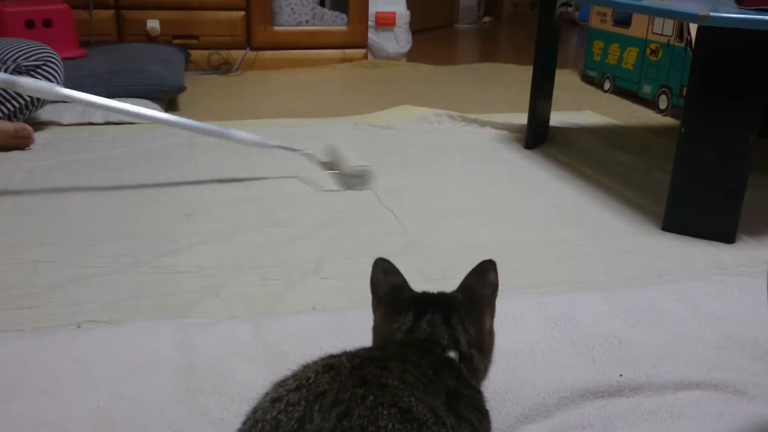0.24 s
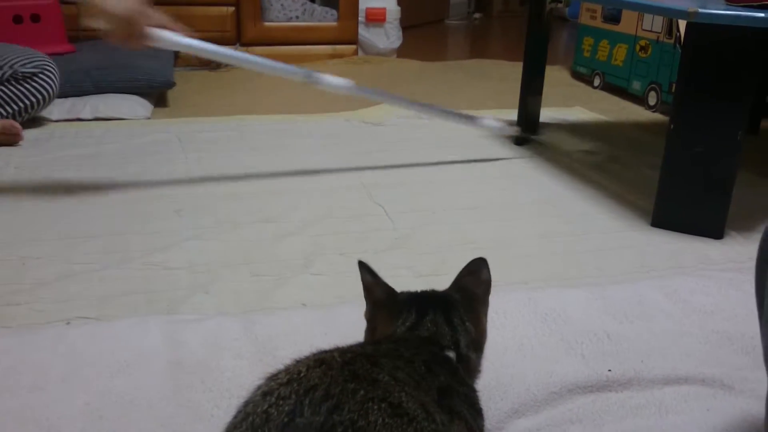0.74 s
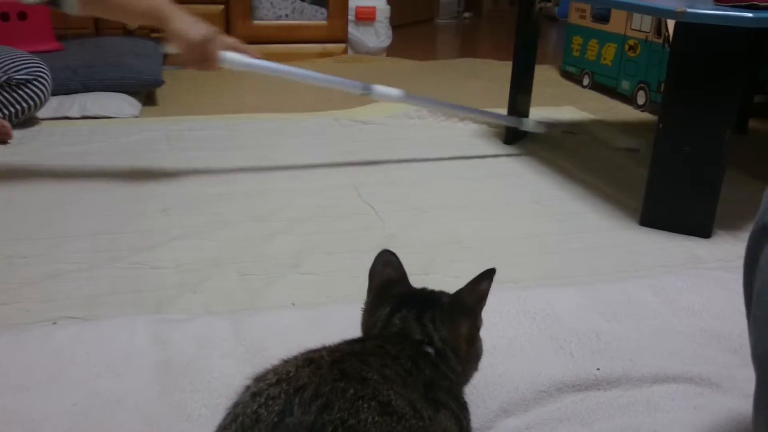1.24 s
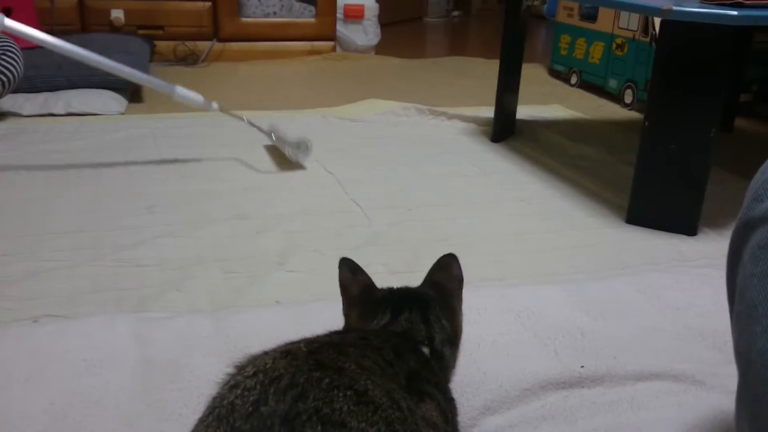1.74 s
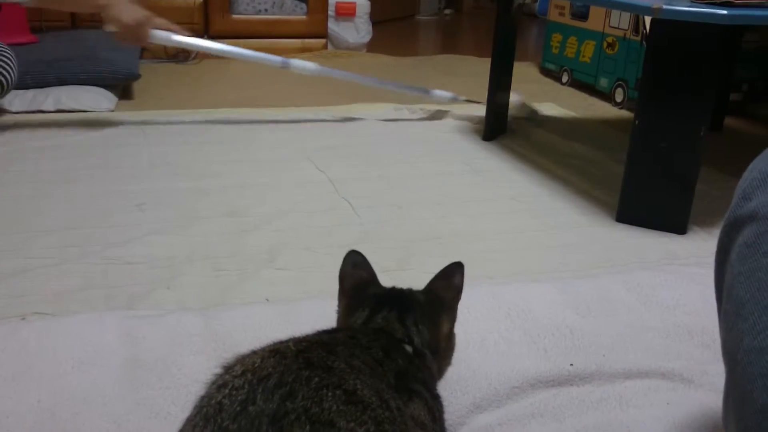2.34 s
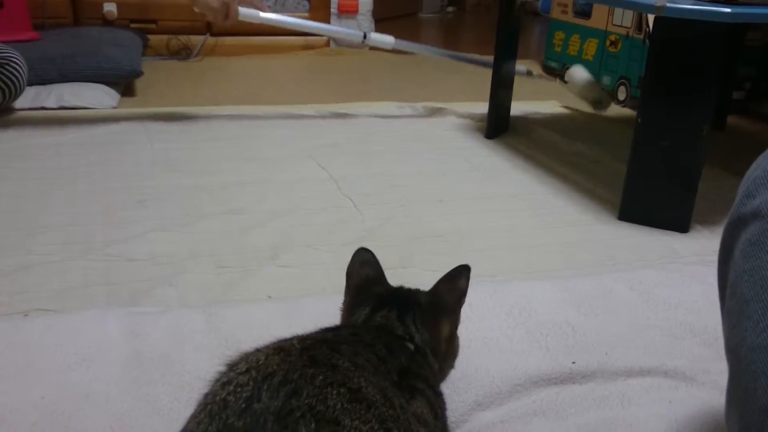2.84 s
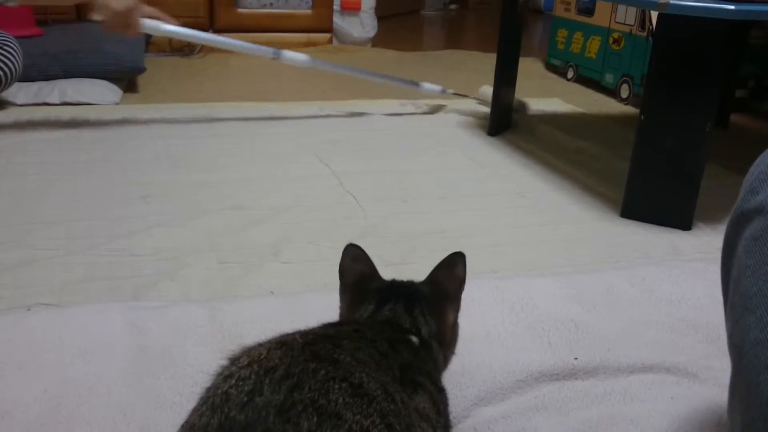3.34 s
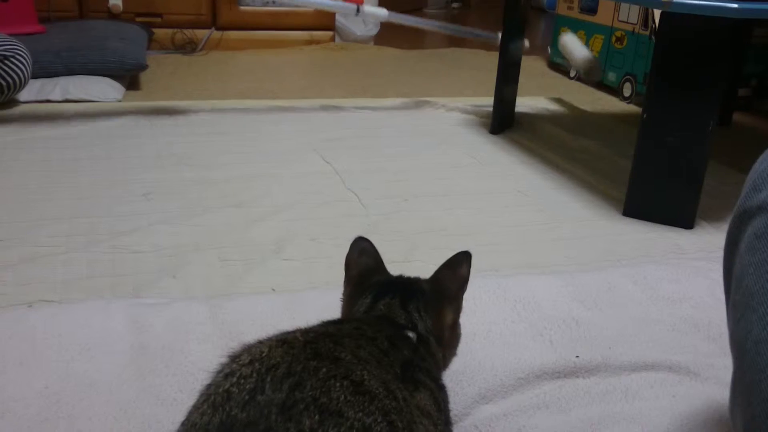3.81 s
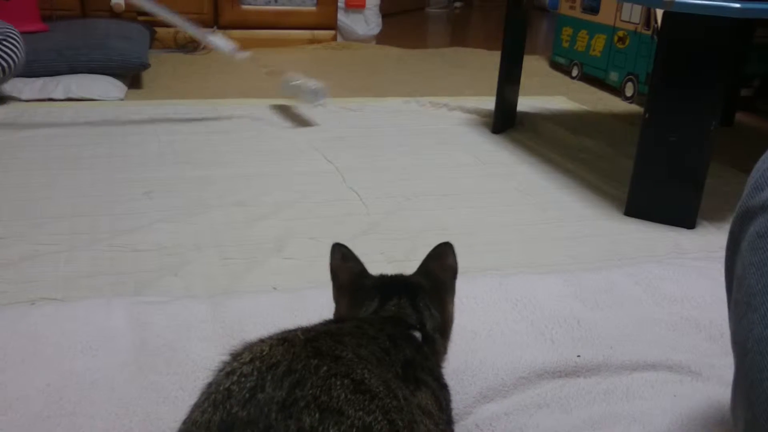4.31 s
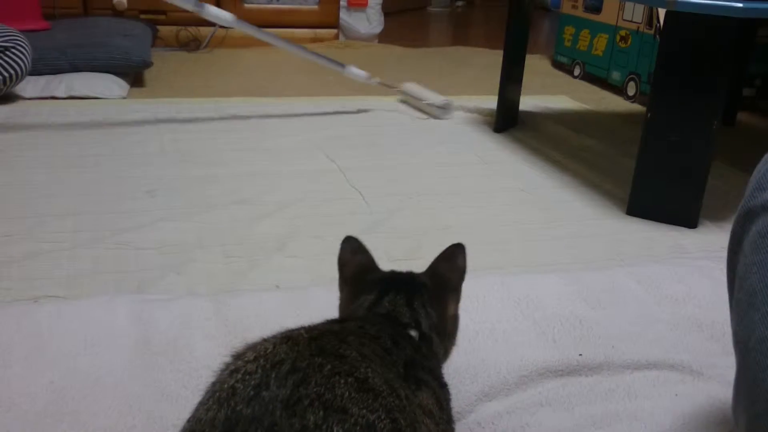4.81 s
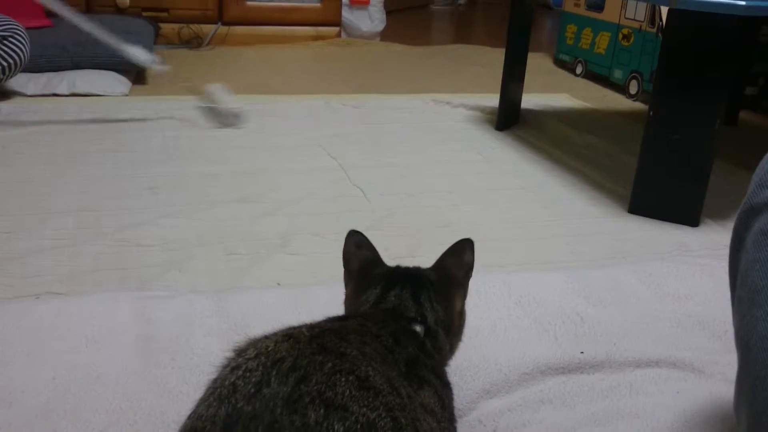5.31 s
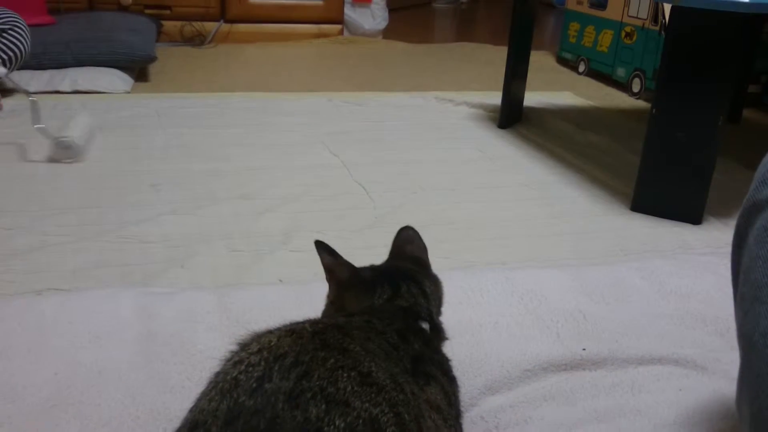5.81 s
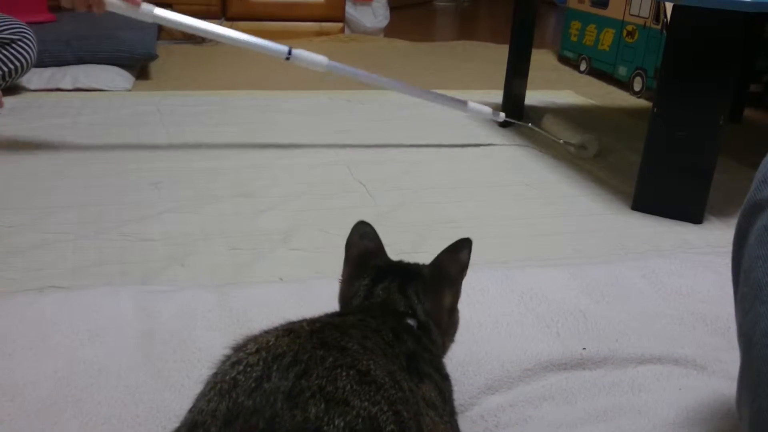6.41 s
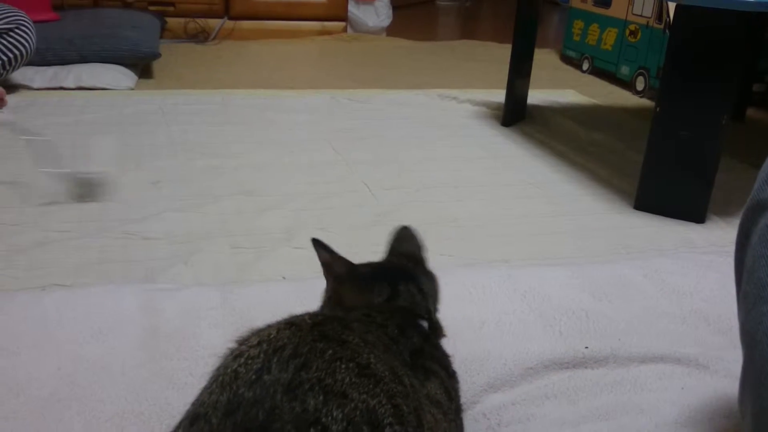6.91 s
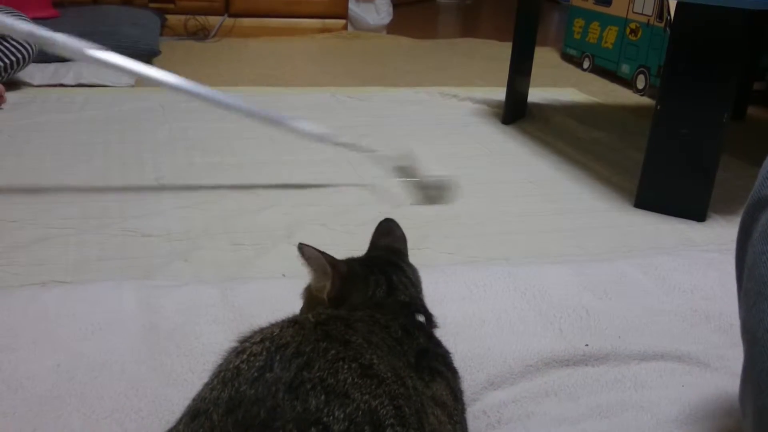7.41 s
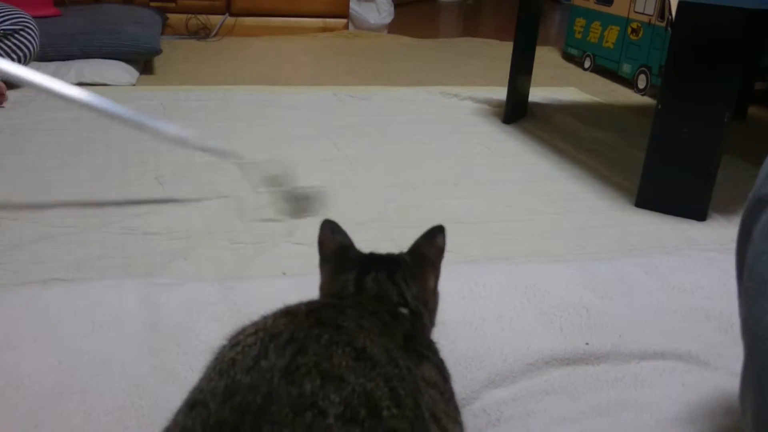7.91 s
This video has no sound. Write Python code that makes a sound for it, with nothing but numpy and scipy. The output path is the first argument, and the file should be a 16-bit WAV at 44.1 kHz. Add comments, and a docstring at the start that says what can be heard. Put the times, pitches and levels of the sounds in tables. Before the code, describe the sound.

A small carpeted living room, heard closely in stereo with a short room tail over faint low rumble and hiss. A sticky roller is already moving at 0 s, its tape crackling dryly; another light stroke runs from 0.3 to 0.9 s. A stronger sweep at 1.0-1.5 s has faint axle chirps and a knock of the handle on a low table near 1.2 s. The roller slaps the rug at 1.9 s, then a louder, sharp knock rings at 2.1 s with a dull floor thump. From 2.3 to 4.2 s it is mostly quiet, with very faint rolling and soft slaps at 3.0 and 4.2 s. Crackling sweeps return at 4.4 and 4.9 s, with a tiny squeak at 5.35 s and a crisp slap at 5.65 s. Strokes continue from 5.7 s, fullest around 6.5-6.8 s, popping and tearing, with brief chirps at 5.9, 7.2 and 7.75 s, fading near 8 s.

```python
"""Lint roller on a living-room rug

A small carpeted living room: a sticky roller on a long handle sweeps the rug before two microphone channels.
The tape crackles as fibres and tufts tear off it: random clicks, each shaped by a broad resonance.
The plastic axle chirps in gliding tones; the roller slaps the rug and twice the handle knocks a low table,
as bursts of clicks with ringing handle and floor modes. Faint rumble and hiss lie behind, as shaped noise.
"""
import sys
import numpy as np
from scipy import signal
from scipy.fft import rfft, irfft, next_fast_len
from scipy.io import wavfile
from scipy.ndimage import uniform_filter1d

SR = 44100
rng = np.random.default_rng(int(sys.argv[2]) if len(sys.argv) > 2 else 0)


def dump_mix(stems):
    """Bounce the given channels to the path in sys.argv[1] as a 16-bit WAV at rate SR."""
    frames = np.atleast_2d(stems).T  # one column per channel
    limited = np.clip(frames, -1, 1)  # hard clip at full scale
    pcm = np.round(limited * 32767).astype(np.int16)
    wavfile.write(sys.argv[1], SR, pcm)


N = 359415
TIME = np.arange(N) / SR
BINS = np.fft.rfftfreq(2 * N, 1 / SR)


def amp(db):
    """Decibels to gain."""
    return 10 ** (np.asarray(db) / 20)


def unit(x):
    """Scales to an energy of one."""
    return x / np.sqrt(np.sum(x ** 2) + 1e-20)


def read(points, hz):
    """Joins (frequency [Hz], value) points on a log-frequency axis."""
    f, value = np.transpose(points)
    return np.interp(np.log(hz + 1), np.log(f + 1), value)


def add(mix, start_s, sound):
    """Mixes a sound in at a time."""
    part = mix[max(round(start_s * SR), 0):][:len(sound)]
    part += sound[:len(part)]


def click(spectrum, pitch_hz, tilt_db=0, bump_db=8, bump_octaves=0.15, size=2048):
    """Causal click of energy one: a spectrum tilted by dB per octave, with a broad resonance at its pitch."""
    hz = abs(np.fft.fftfreq(size, 1 / SR))
    octaves = np.log2(np.maximum(hz, 500) / pitch_hz)  # the tilt stays level below 500 Hz
    resonance_db = bump_db * np.exp(-(octaves / bump_octaves) ** 2)
    db = read(spectrum, hz) + tilt_db * octaves + resonance_db
    minimum_phase = np.exp(np.conj(signal.hilbert(np.log(amp(db)))))
    return unit(np.fft.ifft(minimum_phase).real)


def pair(likeness, size):
    """Spectra of two white noises that are partly alike."""
    a, b = rfft(rng.standard_normal((2, size)))
    c = np.clip(read(likeness, np.fft.rfftfreq(size, 1 / SR)), -1, 1)
    return np.array([a, c * a + np.sqrt(1 - c ** 2) * b])


def burst(decay_s, rise_s, size=4096):
    """A run of tiny clicks that swells and quickly dies, with no pitch of its own."""
    t = np.arange(size) / SR
    swell = (1 - np.exp(-t / rise_s)) * np.exp(-t / max(abs(decay_s), 1e-4))
    run = rng.standard_normal(size) * swell
    for _ in range(3):
        flat = irfft(np.exp(1j * np.angle(rfft(run))))  # equal strength at all frequencies
        run = flat * swell ** .3
    return unit(run)


def contacts(rows, spectrum, level_db, rise_s):
    """Each contact is a burst of clicks with its own pitch, brightness and length."""
    out = np.zeros(N)
    for start_s, db, pitch_hz, tilt_db, decay_s, *_ in rows:
        sound = signal.fftconvolve(burst(decay_s, rise_s), click(spectrum, pitch_hz, tilt_db))
        add(out, start_s, amp(db + level_db) * sound)
    return out


def ring(hz, t60_s, db, rise_s):
    """Dying modes, out of step with each other, that swell over a short rise time (one for all, or one each)."""
    t = np.arange(SR * 3 // 4) / SR
    turns = hz[:, None] * t + rng.random((len(hz), 1))
    decay = amp(db[:, None] - 60 * t / t60_s[:, None])
    swell = 1 - np.exp(-t / np.reshape(rise_s, (-1, 1)))
    return (decay * np.sin(2 * np.pi * turns) * swell).sum(0)


# Likeness of the room tail in the two channels, opposed in the bass:
# (frequency [Hz], likeness [-1 opposed to 1 alike, clipped])
TAIL_LIKENESS = [(50, -1.3), (250, -0.87), (650, -0.69), (1300, 0.22), (15000, -0.39)]


def room(x, wet_db, t60_low=0.29, t60_high=0.31, build=0.00033, echo_s=0.01076, echo_gain=1.,
         lag_ms=0.089, count=3):
    """Direct sound, then short tails with a swell for the ceiling bounce; their mix cycles once a second."""
    size = SR // 2
    t = np.arange(size) / SR
    ceiling = echo_gain * np.exp(-((t - echo_s) / 0.0018) ** 2)
    shape = 1 - np.exp(-t / build) + ceiling
    out = np.array([x, -np.interp(TIME - lag_ms / 1000, TIME, x)])  # right: inverted and slightly late
    for k in range(count):
        noise = irfft(pair(TAIL_LIKENESS, size), size)
        hz, at, z = signal.stft(noise, SR, nperseg=256)
        t60 = read([(1000, t60_low), (8000, t60_high)], hz)[:, None]
        z = z * amp(-60 * at / t60)
        tail = signal.istft(z, SR, nperseg=256)[1][:, :size] * shape
        tail = tail / np.linalg.norm(tail[0])
        share = np.cos(np.pi * (2 * TIME + k / count)) * np.sqrt(2 / count)
        out += amp(wet_db) * signal.oaconvolve((x * share)[None], tail, axes=1)[:, :N]
    return out / np.sqrt(1 + amp(wet_db) ** 2)


# Balance of the two channels: (frequency [Hz], left minus right [dB])
CHANNEL_LEAN = [(60, -3.5), (300, -5.5), (700, -9), (1300, -7), (2400, -9), (4400, -11.5), (5400, 5.5),
                (8100, 2), (10000, 9.5), (12000, -10), (15000, -3)]


def lean(near):
    """Leans the sources right up to some 5 kHz, then left, then right again in the top treble."""
    size = next_fast_len(N + SR, real=True)
    lean_db = read(CHANNEL_LEAN, np.fft.rfftfreq(size, 1 / SR))
    gains = amp(np.array([lean_db, -lean_db]) / 2)
    return irfft(rfft(near, size) * gains, size)[:, :N]


# Spectrum of the empty room: (frequency [Hz], relative density [dB per Hz])
AIR_SPECTRUM = [(20, -11), (45, 0), (62, 15), (100, 3.5), (200, 0), (900, 3), (2500, -2.5), (5000, -10.5),
                (6800, -6), (11000, -16.5), (15000, -12.5)]
# Background level, both channels averaged: (time [s], level [dB])
BACKGROUND_LEVEL = [(0, -62), (1, -64), (2, -63), (2.8, -65.5), (3.6, -66.5), (4.2, -67), (5, -63.5),
                    (8.15, -63)]
# Likeness of the background in the two channels: (frequency [Hz], likeness [-1 opposed to 1 alike])
BACKGROUND_LIKENESS = [(60, -0.84), (130, -0.46), (640, -0.097), (1400, -0.016)]


def background():
    """Faint room rumble and microphone hiss: one shaped noise with a slowly moving level."""
    spectra = pair(BACKGROUND_LIKENESS, 2 * N) * amp(read(AIR_SPECTRUM, BINS))
    noise = irfft(spectra)[:, :N]
    level_db = np.interp(TIME, *np.transpose(BACKGROUND_LEVEL))
    return unit(noise) * np.sqrt(2 * N) * amp(level_db)


# Floor modes: (frequency [Hz], t60 [s], relative level through the rug [dB], through the table [dB])
FLOOR_MODES = [(53.3, 0.85, -7.5, -10), (69.6, 0.51, -10.5, -6.5), (83.4, 0.22, 5.5, -2.5),
               (96.3, 0.49, -9, -0.5), (115.2, 0.4, -3.5, -8), (136, 0.28, -14, -8.5),
               (170, 0.28, -7.5, -10.5), (183, 0.33, -8.5, -9), (209, 0.31, -8.5, -14),
               (220, 0.14, 2.5, -15.5), (249, .17, -7, -22.5)]


def thumps(rug_db=-2, table_db=2, rise_cycles=2.0):
    """Every blow sets the floor booming, through the rug or through the table's legs; the low modes swell last."""
    out = np.zeros(N)
    hz, t60_s, via_rug, via_table = np.transpose(FLOOR_MODES)
    for rows, modes_db in ((RUG_SLAPS, via_rug + rug_db), (TABLE_KNOCKS, via_table + table_db)):
        for start_s, _, _, _, _, thump_db, *_ in rows:
            add(out, start_s, amp(thump_db) * ring(hz, t60_s, modes_db, rise_cycles / hz))
    return out


# Handle modes: (frequency [Hz], t60 [s], relative level struck at the head [dB], struck on the shaft [dB])
HANDLE_MODES = [(345, .2, -7, -13), (427, .2, -4, -14), (658, .2, -12, -2), (735, .2, -16, -9),
                (887, .18, 2, -7), (914, .18, -1, -16), (1126, .22, -9, -8), (1195, .2, -6, -12),
                (1268, .22, -5, -9), (1373, .2, -9, -14), (1479, .21, -6, 2), (1590, .21, -5, -9),
                (1645, .27, -8, -1), (1675, .27, -5, 0), (1720, .28, -8, -4), (1836, .3, -12, -10),
                (1970, .22, -9, -11), (2035, .24, -14, -10), (2295, .2, -5, -7), (2330, .2, -12, -5),
                (2392, .17, -12, -2), (2495, .18, -9, -5), (2670, .2, -14, -12), (3141, .2, -10, -11),
                (3636, .22, -6, -11), (3912, .26, -10, -12), (4095, .24, -11, -11)]


def handle(level_db=-8, rise_s=.014):
    """The handle rings after a knock; the place of the blow sets the mix of its modes."""
    out = np.zeros(N)
    hz, t60_s, at_head, at_shaft = np.transpose(HANDLE_MODES)
    for start_s, db, *_, place in TABLE_KNOCKS:
        modes_db = at_shaft if place > .5 else at_head
        add(out, start_s, amp(db + level_db) * ring(hz, t60_s, modes_db, rise_s))
    return out


# Axle chirps: (time [s], relative level [dB], length [s], start [Hz], end [Hz], roughness [0-1])
AXLE_CHIRPS = [(1.062, -56, 0.006, 5300, 5500, 0.1), (1.068, -51.5, 0.026, 5250, 5500, 1),
               (1.092, -54, 0.019, 5800, 5890, 0.11), (1.112, -53, 0.018, 5860, 5820, 0.1),
               (5.341, -51.5, 0.013, 5110, 5600, 0.13), (5.354, -37.5, 0.0073, 5720, 5700, 0.1),
               (5.3591, -36.5, 0.0065, 5920, 6560, 0.78), (5.360, -42, 0.022, 5950, 5760, 0),
               (5.932, -41, 0.0031, 6150, 6570, 0.4), (5.941, -44, 0.0065, 7100, 7550, 0.7),
               (7.204, -46.5, 0.0084, 5730, 5060, 0.43), (7.749, -34.5, 0.0044, 6590, 6570, 0.37)]


def axle(level_db=2, octave_db=-17, waver=0.14):
    """The plastic axle sticks and slips in short chirps; uneven slips make them scratchy."""
    out = np.zeros(N)
    for start_s, db, length_s, start_hz, end_hz, rough in AXLE_CHIRPS:
        jitter = uniform_filter1d(rng.standard_normal(4096), size=9) * 3
        hz = np.linspace(start_hz, end_hz, int(np.clip(length_s * SR, 32, 4096)))
        uneven_hz = hz * (1 + waver * rough * jitter[:len(hz)])
        turn = 2 * np.pi * np.cumsum(uneven_hz) / SR
        swell = np.sin(np.linspace(0, np.pi, len(hz)))
        tone = np.sin(turn) + amp(octave_db) * np.sin(2 * turn)
        add(out, start_s, amp(db + level_db) * swell * tone)
    return out


# Handle against the table: (time [s], relative level [dB], pitch [Hz], brightness [dB per octave],
# contact decay setting [s], relative floor thump [dB], place [0 head - 1 shaft])
TABLE_KNOCKS = [(1.232, -29.5, 4670, 6, 0.0078, -39.5, 0), (1.237, -30, 920, -3, 0.0044, -62, 0.11),
                (2.1169, -18.5, 3970, -1, 0.0022, -40.5, 1), (2.128, -25.5, 1680, -4.5, 0.0066, -81, 1)]
# Spectrum of a knock: (frequency [Hz], relative density [dB per Hz])
KNOCK_SPECTRUM = [(60, -27), (170, -10.5), (320, -9), (450, -5), (700, -5), (1000, -3.5), (1600, 4),
                  (2500, -2), (3100, -0.5), (3900, -5), (5000, -7.5), (7500, -12), (9500, -20),
                  (11000, -25.5), (15000, -34.5)]


def knocks():
    """The handle meets the low table: hard contacts with a quick rise."""
    return contacts(TABLE_KNOCKS, KNOCK_SPECTRUM, level_db=23, rise_s=0.00039)


# Roller slapping the rug: (time [s], relative level [dB], pitch [Hz], brightness [dB per octave],
# contact decay setting [s], relative floor thump [dB])
RUG_SLAPS = [(1.9022, -33, 3120, 2.5, 0.0028, -37), (1.911, -30.5, 2490, -3.5, 0.0027, -63),
             (3.018, -32, 4470, 4, 0.0038, -54), (3.029, -38, 4380, -0.5, 0.0057, -80),
             (3.043, -41.5, 5890, -3.5, 0.0052, -67), (4.235, -40.5, 4010, 4.5, 0.0043, -65),
             (4.245, -34, 3500, -1, 0.013, -73), (5.644, -28.5, 3896, 0.5, 0.0021, -65),
             (5.655, -53, 4030, -2, 0.0031, -39)]
# Spectrum of a slap: (frequency [Hz], relative density [dB per Hz])
SLAP_SPECTRUM = [(100, -9), (500, -13), (900, -13), (1400, -1), (2200, 2.5), (3200, 1), (4200, -1.5),
                 (5200, -5.5), (7500, -10.5), (9500, -18.5), (11000, -28.5), (15000, -31.5)]


def slaps():
    """The roller lands on the rug: softer contacts with a slower rise."""
    return contacts(RUG_SLAPS, SLAP_SPECTRUM, level_db=21.5, rise_s=0.0022)


# Sweeps over the rug: (start [s], length [s], share of the length spent speeding up [0-1],
# relative level at full speed [dB])
STROKES = [(-0.15, .36, 0.22, -50.5), (0.301, 0.59, .43, -56.5), (1.024, 0.49, 0.61, -48),
           (1.5, 0.2, 0.11, -64.5), (2.036, 0.093, 0.57, -51), (2.25, 0.6, 0, -70),
           (3.157, 0.16, 0.09, -61.5), (3.334, 0.28, 0.47, -70), (4.417, 0.33, 0.3, -53),
           (4.889, 0.7, 0.23, -53.5), (5.742, 0.54, 0.44, -52.5), (6.391, 0.47, 0.65, -48.5),
           (6.901, 0.49, 0.84, -53), (7.575, 0.39, 0.4, -51.5), (8.031, 0.18, 0.55, -59.5)]
DRAG_POWER = 1.4  # the crackle grows as this power of the roller's speed


def rolling():
    """Strength of the crackle: in each sweep the roller speeds up from rest and slows down again."""
    out = np.zeros(N)
    for start_s, length_s, speeding, db in STROKES:
        peak_s = length_s * np.clip(speeding, .05, .95)
        phase = np.interp(TIME - start_s, [0, peak_s, length_s], [0, .5, 1])
        speed = np.maximum(np.sin(np.pi * phase), 0)
        out += amp(db) * speed ** DRAG_POWER
    return out


# Large tufts tearing off the tape: (time [s], relative level [dB], pitch of the snap [Hz])
LARGE_TUFTS = [(0.0217, -44, 2130), (0.1347, -44, 1440), (0.402, -41, 2000), (0.4356, -45.5, 3700),
               (0.4943, -44, 2030), (0.5122, -40.5, 2750), (0.5795, -43, 3640), (0.615, -44.5, 3260),
               (0.7322, -49, 3400), (1.1378, -42, 2350), (1.2092, -39, 4570), (1.221, -34, 4700),
               (1.3153, -36.5, 1640), (1.4361, -41, 2050), (1.5492, -51, 2750), (1.6596, -49.5, 3320),
               (1.9653, -36.5, 3130), (2.5972, -55, 2980), (3.433, -53, 1912), (4.454, -50, 2500),
               (4.517, -34.5, 3570), (4.5955, -36, 2576), (4.6102, -42, 2500), (4.9141, -50.5, 1980),
               (4.9565, -41, 2100), (5.0362, -41, 4170), (5.0582, -35, 2116), (5.0903, -39.5, 3340),
               (5.1241, -40, 4280), (5.1652, -35.5, 2468), (5.191, -38.5, 2370), (5.2005, -41, 3140),
               (5.2419, -35.5, 3130), (5.3064, -40.5, 3464), (5.4038, -39, 3400), (5.7962, -38, 2190),
               (5.8117, -36.5, 2580), (5.8456, -38, 1875), (5.9041, -36, 1930), (5.9813, -37, 3496),
               (6.0367, -36.5, 2030), (6.1299, -42, 3320), (6.426, -42, 1906), (6.5298, -41, 1720),
               (6.568, -40, 1940), (6.5983, -31, 1766), (6.663, -31, 4500), (6.6963, -35, 1690),
               (6.7337, -31, 3506), (6.8121, -33.5, 3140), (6.9445, -42.5, 3000), (6.9838, -43, 3290),
               (7.0531, -39, 2050), (7.0899, -40.5, 1920), (7.1285, -36, 3287), (7.2053, -36.5, 4610),
               (7.2974, -39.5, 3360), (7.3513, -42, 1737), (7.6258, -42.5, 1905), (7.7189, -37.5, 1627),
               (7.7923, -32.5, 4664), (7.8316, -36.5, 1826), (7.8678, -32, 4400), (7.9338, -39, 1766)]
# Spectrum of the tape's clicks: (frequency [Hz], relative density [dB per Hz])
TAPE_SPECTRUM = [(40, -26), (80, -13), (200, -18), (420, -7), (1000, -9.5), (1300, 1.5), (1700, 3),
                 (2600, 2.5), (4600, -1), (5300, -7.5), (7500, -11.5), (9500, -16.5), (11000, -34),
                 (14500, -26.5)]
# every tuft: middle decay setting [s], rise [s], brightness [dB per octave]
TEAR_S, TEAR_RISE_S, TEAR_TILT_DB = .003, .0015, -0.5
# small tufts: rate while rolling, level relative to the stroke, random spread of that level
SMALL_TUFTS_PER_S, SMALL_TUFT_DB, SMALL_TUFT_SPREAD_DB = 20, 9.5, 0.5


def snaps(level_db=18.5):
    """Whole tufts tear loose in milliseconds: large ones, and small ones at random while the roller moves."""
    strength_db = 20 * np.log10(rolling() + 1e-9)
    chance, size, pitch_hz = rng.random(N), rng.standard_normal(N), rng.uniform(1620, 4830, N)
    torn = (chance < SMALL_TUFTS_PER_S / SR) & (strength_db > -70)  # the faintest strokes tear none
    small_db = strength_db + SMALL_TUFT_DB + SMALL_TUFT_SPREAD_DB * size
    small = np.transpose([TIME, small_db, pitch_hz])[torn]
    tufts = [(*row, TEAR_TILT_DB, TEAR_S * rng.uniform(.5, 1.5)) for row in [*LARGE_TUFTS, *small]]
    return contacts(tufts, TAPE_SPECTRUM, level_db, TEAR_RISE_S)


def peeling(level_db=-5.0, fibres_per_s=600, spread_db=3, clump_db=7, clump_s=0.0083, count=7):
    """Fibres let go of the tape in clumps as the roller turns; each of several pitches clumps on its own."""
    strength = rolling()
    knots = np.arange(0, 10, max(clump_s, .002))
    out = np.zeros(N)
    for pitch_hz in np.geomspace(1600, 4500, count):
        sizes = amp(spread_db * np.minimum(rng.exponential(1, N), 4)) * rng.choice([-1, 1], N)
        heights = np.clip(rng.standard_normal(N)[:len(knots)], -2, 2)
        clumps = amp(clump_db * np.interp(TIME, knots, heights))
        released = rng.random(N) < fibres_per_s / SR  # rate at each pitch
        clicks = unit(sizes * clumps * released) * np.sqrt(N / count)
        out += signal.oaconvolve(clicks * strength, click(TAPE_SPECTRUM, pitch_hz))[:N]
    return amp(level_db) * out


def scene():
    """All sources in the room, the handle and floor almost dry, with the background behind them."""
    near = room(handle() + thumps(), wet_db=-22.5)
    near += room(axle(), wet_db=0, t60_low=.33, t60_high=.3, echo_gain=.7)
    near += room(knocks() + slaps(), wet_db=4.5, t60_low=0.32, t60_high=0.23, echo_gain=0.46)
    near += room(snaps() + peeling(), wet_db=4.5, echo_gain=2.0)
    return lean(near) + background()


EDGE_HZ = 15850


def record(dry):
    """The recorder's band limit: a steep low-pass filter."""
    low_pass = signal.firwin(511, EDGE_HZ, window=("kaiser", 9), fs=SR)
    return signal.oaconvolve(dry, low_pass[None], "same")


dry = scene()
out = record(dry)
dump_mix(out)
```